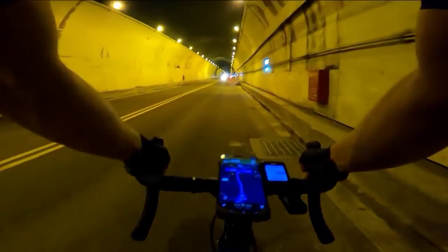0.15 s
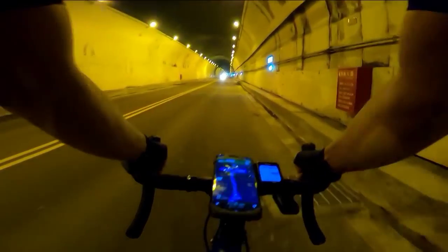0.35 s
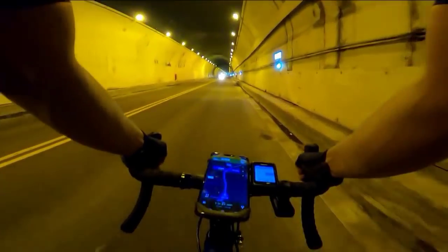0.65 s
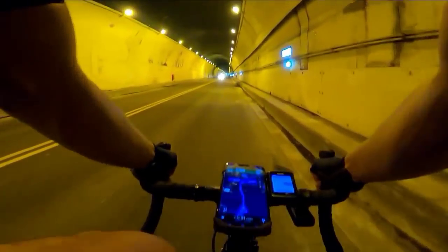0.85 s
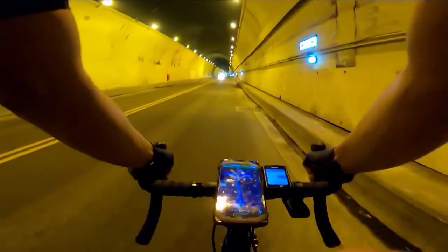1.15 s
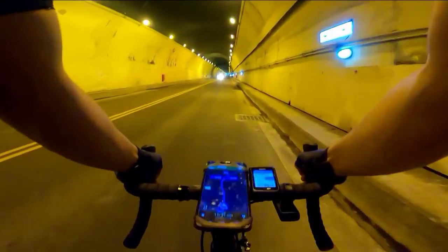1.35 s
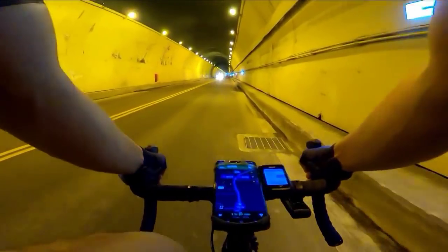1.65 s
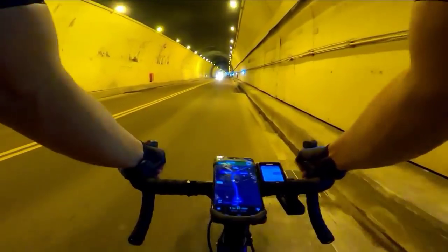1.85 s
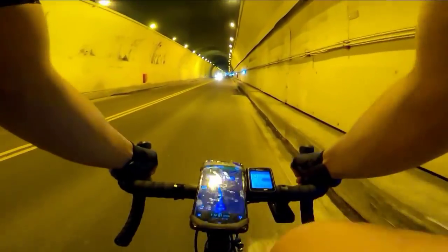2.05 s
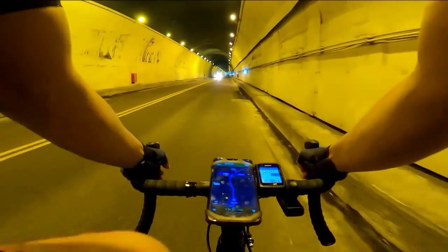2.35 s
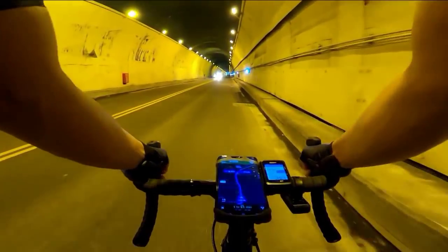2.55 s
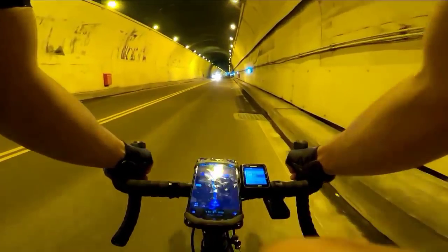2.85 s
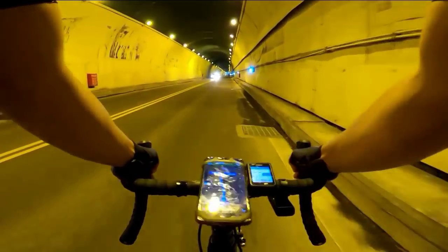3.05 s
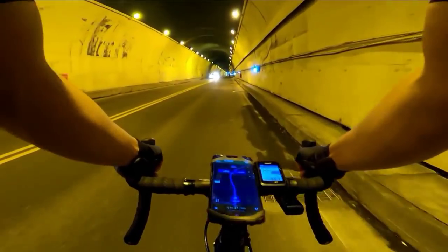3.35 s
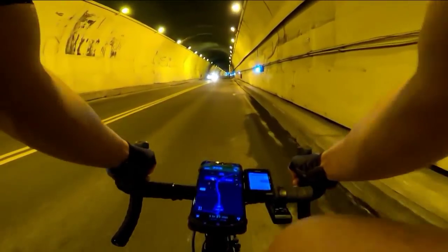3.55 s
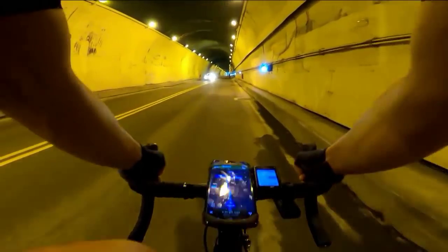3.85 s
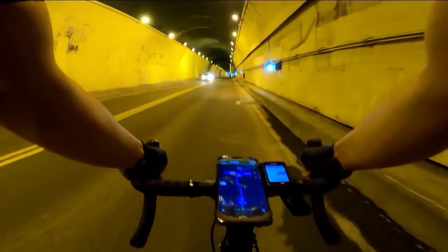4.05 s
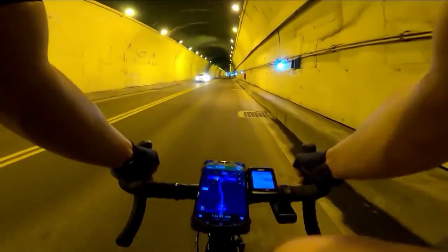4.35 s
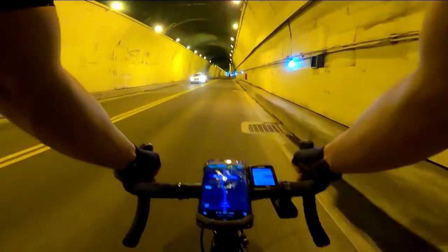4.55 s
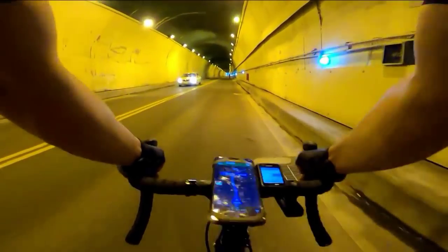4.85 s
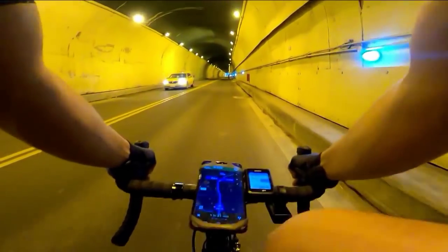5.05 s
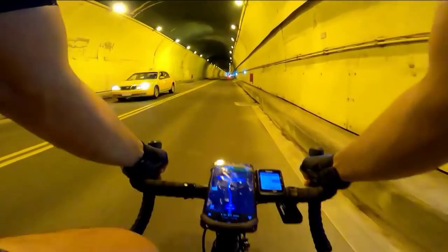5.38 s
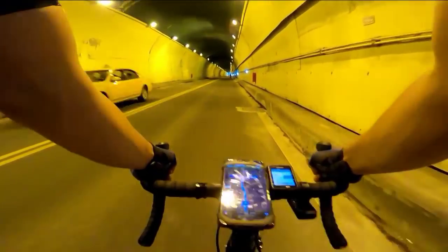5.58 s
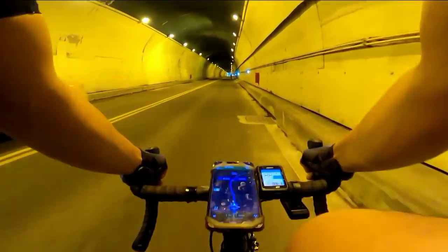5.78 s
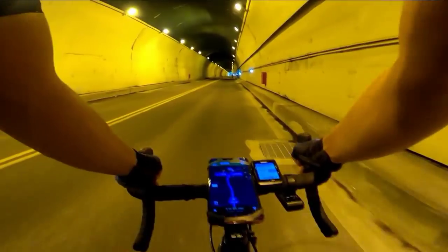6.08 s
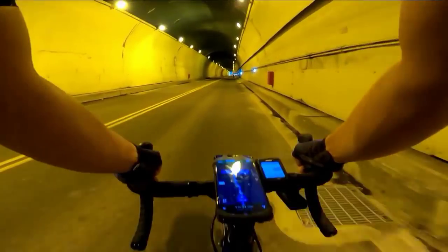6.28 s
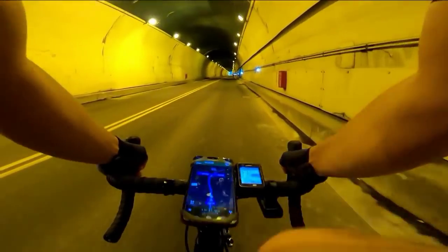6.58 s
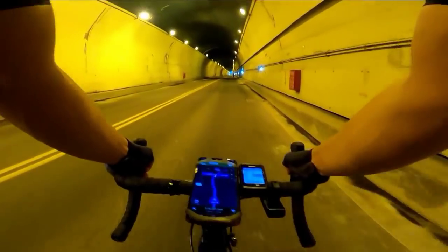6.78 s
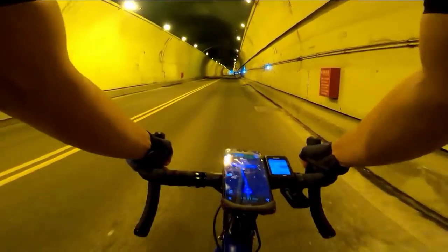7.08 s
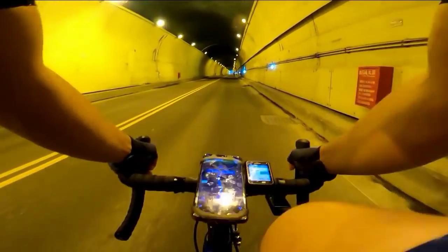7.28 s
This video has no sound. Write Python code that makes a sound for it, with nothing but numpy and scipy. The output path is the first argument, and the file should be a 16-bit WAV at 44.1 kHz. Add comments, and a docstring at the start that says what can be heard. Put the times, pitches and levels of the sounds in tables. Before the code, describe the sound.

Fast cycling wind fills a microphone worn on the chest in a road tunnel. Deep rumble and rustle shake both sides separately over a steady airy roar and hiss, which drops out abruptly in gusts. Rough hollow low flutters come mostly from the left, with short dull blows throughout. After about five and a half seconds a car passes in the other lane as a broad tyre roar.

```python
"""A road tunnel, heard from a bicycle ridden fast, through the two microphone ports of a chest camera.
At the ports wind rumbles and rustles as shaped noise; rough gliding tones make hollow swells, mostly left.
Behind them air roars and hisses as noise partly shared by the ports, sagging abruptly in the gusts.
Short noise bursts are hard blows of wind; a car passing in the other lane adds a swell of tyre roar."""
import sys
import numpy as np
from scipy import signal
from scipy.fft import rfft, irfft
from scipy.io import wavfile
from scipy.ndimage import uniform_filter1d, minimum_filter1d

SR = 44100
rng = np.random.default_rng(int(sys.argv[2]) if len(sys.argv) > 2 else 0)


def int16_out(signal):
    """Quantize to a 16-bit WAV file."""
    q = np.round(np.clip(np.atleast_2d(signal).T, -1, 1) * 32767)
    wavfile.write(sys.argv[1], SR, q.astype(np.int16))


N = 327222
TIME = np.arange(N) / SR   # [s]
BINS = np.maximum(np.arange(N // 2 + 1) * SR / N, 1)   # [Hz]


def from_db(db):
    """Decibels to gain."""
    return 10 ** (np.asarray(db) / 20)


def in_time(rows):
    """Each column of a curve after its time column, sample by sample."""
    s, *columns = np.transpose(rows)
    return [np.interp(TIME, s, c) for c in columns]


def in_frequency(points):
    """A table of (frequency [Hz], value) read at every bin, along a logarithmic frequency axis."""
    hz, value = np.transpose(points)
    return np.interp(np.log(BINS), np.log(hz), value)


def random_bins():
    """White noise as a spectrum."""
    return rng.standard_normal(len(BINS)) + 1j * rng.standard_normal(len(BINS))


def drift(rate):
    """Slow chance with a spread of 1, changing about `rate` times a second."""
    step, points = 64, 8192   # drawn once every 64 samples
    hz = np.arange(points // 2 + 1) * SR / (step * points)
    slow = irfft(rfft(rng.standard_normal(points)) / (1 + (hz / rate) ** 2))
    return np.interp(np.arange(N) / step, np.arange(len(slow)), slow / slow.std())


def noise(spectrum):
    """Coloured noise at one port, rms 1."""
    x = irfft(random_bins() * from_db(in_frequency(spectrum)), N)
    return x / x.std()


# likeness of the two ports: (frequency [Hz], likeness [0-1])
PORT_LIKENESS = [(100, .88), (500, .88), (1200, .89), (1480, .6), (1900, .83), (3000, .76), (4000, .48),
                 (5000, .13), (6000, .02)]
# phase lead of the left port: (frequency [Hz], lead [rad])
LEFT_LEAD = [(150, 1.4), (400, 1.05), (1000, .68), (1380, 1.05), (1680, .36), (2100, .72), (3000, .9),
             (5000, .9)]


def airborne(spectrum, pan_db=0):
    """Noise that reaches both ports: partly shared, the left one leading; rms 1."""
    alike = np.clip(in_frequency(PORT_LIKENESS), 0, 1)
    shared = np.sqrt(alike) * random_bins()
    left = shared * np.exp(1j * in_frequency(LEFT_LEAD)) + np.sqrt(1 - alike) * random_bins()
    right = shared + np.sqrt(1 - alike) * random_bins()
    panned = np.array([left * from_db(pan_db / 2), right * from_db(-pan_db / 2)])
    x = irfft(panned * from_db(in_frequency(spectrum)), N)
    return x / x.std()


def steadied(x, span_s):
    """Evens out chance swells longer than span_s, so that the flow sets the strength."""
    power = uniform_filter1d(x ** 2, max(int(span_s * SR), 2), mode="wrap")
    return x / np.sqrt(.9 * power + .1)


def swell(s, half_length_s):
    """A smooth (Gaussian) rise and fall around time s, of height 1."""
    return np.exp(-.5 * ((TIME - s) / half_length_s) ** 2)


def shelved(x, db, share):
    """Raises or lowers one part of the spectrum by a level that moves in time."""
    return x + (from_db(db) - 1) * irfft(rfft(x) * in_frequency(share), N)


# sudden drops of the rush in the gusts: (time of onset [s], depth [dB], hold [s], recovery [s])
RUSH_SAGS = [(0.352, 5, 0.18, 0.07), (0.702, 1.5, 0.075, 0.034), (0.833, 4.5, 0.061, 0.23),
             (1.228, 4, 0.045, 0.11), (1.904, 6, 0.015, 0.037), (1.965, 5.5, 0.26, 0.11),
             (2.384, 6.5, 0.046, 0.079), (2.659, 6, 0.023, 0.037), (3.646, 3, .04, 0.08),
             (4.177, 7, 0.019, .11), (4.695, 11.5, 0.013, 0.1), (4.986, 8, 0.035, 0.092),
             (6.56, 2, 0.043, .02), (6.74, 6.5, .025, 0.057), (6.879, 4.5, 0.045, 0.12)]


def sag_db():
    """Every sag falls within milliseconds, holds, and recovers evenly in dB."""
    fall_s, total = .007, 0
    for s, depth, hold, recovery in RUSH_SAGS:
        corners = s + np.cumsum([0, fall_s, hold, recovery])
        total = total + np.interp(TIME, corners, [0, -depth, -depth, 0])
    return total


# moments when the small eddies die away: (time of deepest point [s], depth [dB], half length [s])
EDDY_CALMS = [(0.16, 4, 0.061), (1.001, 7, 0.027), (1.513, 4.5, 0.035), (2.471, 9, 0.023),
              (3.189, 14.5, 0.032), (3.529, 13.5, 0.039), (3.932, 7, 0.037), (4.76, 8, 0.023),
              (5.971, 1, 0.057), (6.24, 7, .06)]


def calm_db():
    """The small eddies die away and return smoothly."""
    return -sum(depth * swell(s, length) for s, depth, length in EDDY_CALMS)


# turbulence on each port, before gain and lumps: (time [s], rumble level [dB])
LEFT_RUMBLE_LEVEL = [(0.0, -21), (0.44, -14.5), (0.76, -25), (0.84, -14), (1.08, -19), (1.76, -15),
                     (1.92, -23), (2.04, -20.5), (2.12, -22.5), (2.36, -15), (2.72, -19.5), (2.8, -13),
                     (3.0, -19), (3.12, -21), (3.2, -11.5), (3.42, -23), (3.52, -17), (3.72, -15),
                     (3.84, -26), (4.0, -15), (4.2, -20), (4.48, -18.5), (4.76, -23), (4.84, -13.5),
                     (4.96, -21), (5.04, -19.5), (5.3, -20), (5.4, -16.5), (5.68, -25), (5.8, -19.5),
                     (6.72, -20.5), (7.41, -15)]
RIGHT_RUMBLE_LEVEL = [(0.0, -15), (0.28, -14), (0.44, -20.0), (0.68, -10.5), (1.16, -12), (1.44, -14),
                      (1.48, -13.5), (1.96, -11), (2.08, -23.5), (2.16, -9), (2.28, -16), (2.4, -11.5),
                      (2.76, -15.5), (3.16, -14.5), (3.28, -18.5), (3.4, -9.5), (3.64, -16), (4.04, -11.0),
                      (4.36, -12.5), (4.96, -16), (5.12, -21), (5.2, -12), (5.92, -12.5), (6.16, -10.5),
                      (6.24, -15.5), (6.44, -13.5), (6.52, -19), (6.72, -19), (6.96, -18), (7.0, -12),
                      (7.24, -13.0), (7.41, -19.5)]
# colour of the big eddies at each port: (frequency [Hz], relative level [dB per Hz])
LEFT_RUMBLE_COLOUR = [(3, -42), (10, -12), (18, 0.5), (32, -7.5), (44, 2), (60, -15), (85, -6.5), (115, -9),
                      (170, -18), (400, -32), (1500, -82)]
RIGHT_RUMBLE_COLOUR = [(3, -33), (10, -3), (22, 2.5), (45, 2.5), (75, 2.5), (115, -5.5), (160, -13),
                       (300, -15.5), (1500, -77)]
# colour of the smaller eddies at each port: (frequency [Hz], relative level [dB per Hz])
LEFT_EDDY_COLOUR = [(60, -30.5), (130, -5), (190, -1.5), (270, -1.5), (350, -6.5), (480, -26.5), (700, -17),
                    (1500, -49.5), (4000, -81)]
RIGHT_EDDY_COLOUR = [(60, -28), (120, -0.5), (175, 9.5), (260, -7), (360, -6), (500, -11.5), (800, -14),
                     (1500, -32.5), (4000, -69)]


def buffeting(lump_db=1.7, lump_rate=14, right_lump_db=1.7, patchy_db=2.5, patchy_rate=9,
              eddy_follow=0.2, left_gain_db=2.2, right_gain_db=0.3, left_eddies_db=-18.5, right_eddies_db=-23):
    """Each port sits in its own turbulence: big eddies rumble, smaller ones rustle above them in patches."""
    left_db, = in_time(LEFT_RUMBLE_LEVEL)
    right_db, = in_time(RIGHT_RUMBLE_LEVEL)
    left_level = from_db(left_db + left_gain_db + lump_db * drift(lump_rate))
    right_level = from_db(right_db + right_gain_db + right_lump_db * drift(lump_rate))
    left_rumble = left_level * steadied(noise(LEFT_RUMBLE_COLOUR), span_s=0.11)
    right_rumble = right_level * steadied(noise(RIGHT_RUMBLE_COLOUR), span_s=0.06)
    patches = patchy_db * drift(patchy_rate) + calm_db()
    left_rustle = from_db(left_eddies_db + patches + sag_db()) * noise(LEFT_EDDY_COLOUR)
    follow_db = eddy_follow * (right_db - right_db.mean())   # the right rustle partly follows its rumble
    right_rustle_level = from_db(right_eddies_db + patches + .5 * sag_db() + follow_db)
    right_rustle = right_rustle_level * steadied(noise(RIGHT_EDDY_COLOUR), span_s=0.013)
    return np.array([left_rumble + left_rustle, right_rumble + right_rustle])


def churned(x, patchy_db, rate):
    """Eddies of different sizes come and go: each band swells and thins on its own."""
    centres = np.geomspace(300, 2000, num=6)   # [Hz]
    spectrum, out = rfft(x), 0
    for share in np.eye(len(centres)):
        band = irfft(spectrum * np.interp(BINS, centres, share), N)
        out = out + band * from_db(patchy_db * drift(rate))
    return out / out.std()


# strength of the airflow, before gains: (time [s], roar level [dB], hiss level [dB])
AIRFLOW_LEVELS = [(0.0, -27, -33), (0.07, -19.5, -33.5), (0.21, -19, -31.5), (0.34, -19.5, -31.5),
                  (0.66, -20.5, -33.5), (1.14, -18.5, -30), (1.38, -21.5, -34), (1.5, -19, -30.3),
                  (1.83, -19, -29.5), (2.39, -18, -28.5), (2.83, -20, -31), (3.09, -17.5, -27),
                  (3.4, -19, -29), (3.8, -19.5, -30), (3.87, -18.5, -28.5), (4.9, -19, -28.5),
                  (5.21, -20, -30), (5.36, -17.5, -25.5), (5.55, -18.5, -28.5), (5.88, -19.5, -28.5),
                  (6.39, -23, -31.5), (6.52, -22, -38.5), (6.58, -28.5, -41), (6.85, -24.5, -35.5),
                  (7.18, -20.5, -32), (7.42, -28, -39.5)]
# the hiss shifts to the right behind the car: (time [s], left-right difference [dB])
HISS_SHIFT = [(0, -2), (5.8, -1.9), (6.4, -6), (7.42, -6)]
# puffs of bright, ragged hiss, and thin spots: (time of peak [s], lift [dB], half length [s])
HISS_PUFFS = [(0.63, 0.5, .025), (0.817, 2, .018), (1.036, 3.5, 0.018), (1.196, 2, .015), (1.553, 2, 0.039),
              (1.689, 2, 0.021), (1.797, 1, 0.014), (2.26, 3, 0.024), (2.339, 2, .035), (2.537, 1, 0.028),
              (2.626, -4, 0.016), (2.952, -0.7, 0.023), (3.18, 0.5, 0.021), (3.378, 3, .018),
              (4.347, 0.5, 0.021), (4.913, 1.5, 0.02), (5.42, 1.5, 0.018), (5.48, 3.5, 0.011),
              (5.537, 2.5, .016), (5.706, 1, .015), (5.775, 1.5, 0.016), (5.868, 1.5, 0.021),
              (6.059, 1.5, .022), (6.331, 1.5, .05), (6.645, 0.5, .014), (6.732, 1, 0.018),
              (6.991, 3, 0.026), (7.415, 5, 0.011)]
# colour of the tunnel roar, then of the hiss: (frequency [Hz], relative level [dB per Hz])
ROAR_COLOUR = [(40, -9), (140, 4.5), (260, 4.5), (480, 3), (620, -0.5), (810, 0), (950, 1.5), (1150, -0.5),
               (1400, -5.5), (1650, -7), (2000, -17.5), (2800, -22.5), (5000, -61.5), (12000, -76.5)]
HISS_COLOUR = [(600, -9), (1400, 6), (2000, 5), (2500, 0), (3100, -2.5), (4000, -7), (5200, -13),
               (6100, -15), (6700, -19), (7700, -23), (8200, -30), (10300, -29), (11500, -40.5),
               (14000, -56.5)]
# the part of the roar that thins in the calms: (frequency [Hz], share [0-1])
ROAR_BASS = [(280, 1), (600, 0)]
# lean of the hiss to either port: (frequency [Hz], left-right difference [dB])
HISS_LEAN = [(1500, 2.5), (2300, -0.5), (3200, -1), (6000, -0.5), (7200, 4.5), (10000, 1)]
# lift of the hiss's treble: (time [s], level [dB])
TREBLE_LEVEL = [(0, 0), (5.4, -1), (6.2, 2), (6.9, 1.5), (7.42, 1.5)]
# what counts as treble: (frequency [Hz], share [0-1])
HISS_TREBLE = [(2800, 0), (4800, 1)]


def rush(roar_gain_db=3.0, hiss_gain_db=2.0, roar_sag=0.71, roar_lag_s=0.01, roar_flicker_db=0.42,
         hiss_flicker_db=0.77, grain_db=0.8, roar_pan_db=0.5, surge_db=0.5, puff_grain=0.26,
         roar_puff=0.51, roar_calm=0.33, eddy_rate=45):
    """The tunnel's roar and the hiss of air over the housing, both shaken by the same eddies."""
    roar_db, hiss_db = in_time(AIRFLOW_LEVELS)
    pan_db, = in_time(HISS_SHIFT)
    treble_db, = in_time(TREBLE_LEVEL)
    sag, eddies, surges = sag_db(), drift(eddy_rate), surge_db * drift(17)
    puffs = sum(lift * swell(s, length) for s, lift, length in HISS_PUFFS)

    late_sag = np.interp(TIME - roar_lag_s, TIME, sag)   # the roar drops a moment after the hiss
    roar = churned(airborne(ROAR_COLOUR, roar_pan_db), patchy_db=0.98, rate=15)
    roar = shelved(roar, roar_calm * calm_db(), ROAR_BASS)
    roar_level = roar_db + roar_gain_db + surges + roar_puff * puffs
    roar_level = roar_level + roar_sag * late_sag + roar_flicker_db * eddies

    # the smallest eddies make the hiss ragged, differently at each port
    grain = (grain_db + puff_grain * puffs) * np.array([drift(220), drift(220)])
    hiss = from_db([pan_db / 2, -pan_db / 2]) * airborne(HISS_COLOUR, in_frequency(HISS_LEAN))
    hiss = shelved(hiss, treble_db, HISS_TREBLE)
    hiss_level = hiss_db + hiss_gain_db + surges + puffs + sag + hiss_flicker_db * eddies + grain
    return from_db(roar_level) * roar + from_db(hiss_level) * hiss


def shedding(swells, wander, throb_db, across_lag, rest_db=-24, rest_hz=170.2):
    """A rough tone following each swell's gliding pitch: (strength, tone, tone lagging across_lag [rad])."""
    power = from_db(rest_db + .5 * calm_db()) ** 2   # the shedding between swells
    pull = power * rest_hz
    for s, db, hz, glide, length in swells:
        weight = (from_db(db) * swell(s, length)) ** 2
        power = power + weight
        pull = pull + weight * (hz + glide * (TIME - s))
    pitch = pull / power * (1 + wander * drift(42.59))   # the strongest swell rules the pitch
    phase = 2 * np.pi * np.cumsum(pitch) / SR
    throb = from_db(throb_db * drift(36))
    near, far = throb * np.sin(phase), throb * np.sin(phase - across_lag)
    near, far = [steadied(tone / tone.std(), span_s=0.039) for tone in (near, far)]
    return np.sqrt(power), near, far


# flutter at each port; the strong swells on the left come about once per turn of the pedals, those on
# the right mostly in the gusts; levels before port gain:
# (time of peak [s], level [dB], shedding pitch [Hz], glide [Hz/s], half length [s])
LEFT_SWELLS = [(0.275, -9.5, 187.5, 399, 0.026), (0.36, -11.5, 148.2, -1, 0.035),
               (0.435, -8, 233.4, 199, 0.032), (0.51, -9, 249, 399, .03), (0.62, -14.5, 164.6, -300, 0.029),
               (0.72, -18, 159.6, -200, 0.028), (0.79, -17, 245.5, 500, .03), (0.95, -14, 280, -200, 0.051),
               (1.15, -14, 173.4, 199, 0.036), (1.235, -8, 214.2, 597.5, .028),
               (1.315, -9.5, 243, -300, 0.047), (1.41, -12, 198, -500, .022),
               (1.47, -15, 150.7, -1000, 0.027), (1.57, -15, 185.8, 899.5, .021),
               (1.69, -16.5, 290, 1.5, 0.046), (1.97, -9, 171, 0, 0.031), (2.035, -8, 231.8, 0, 0.02366),
               (2.085, -9, 198.7, -300, 0.024), (2.16, -15, 168.8, -200, 0.05),
               (2.28, -14, 156.6, -450, 0.043), (2.5, -19.5, 401, 799.5, 0.036), (2.59, -17, 279, 2, .04),
               (2.78, -10.5, 227.5, 199, .042), (2.9, -14.5, 201.3, -200, .042),
               (3.06, -13.5, 163.6, -350, 0.046), (3.13, -16.5, 222, -1, .02),
               (3.25, -14.5, 88.2, -1, .045), (3.32, -17.5, 219.1, -300, 0.027), (3.52, -15, 245, 1, .035),
               (3.65, -9.5, 204.7, -1, 0.044), (3.79, -13.5, 167.8, 198, 0.028),
               (4.03, -13.5, 271, -600, .04), (4.21, -18.5, 165, -1, .025),
               (4.38, -14.5, 270.2, -400, .035), (4.55, -18.5, 230, -200, .03),
               (4.66, -17.5, 260.3, 0, 0.036), (4.91, -14.5, 108.8, 498, .06),
               (5.03, -16, 240, -500, 0.028), (5.11, -10.5, 202, -400, 0.034),
               (5.19, -13, 167.8, -400, 0.024), (5.34, -13.5, 182, 1, 0.024), (5.51, -19.5, 473, 1201, .03),
               (5.72, -15, 216, -500, .042), (5.81, -13, 283.3, 2501, .022), (5.95, -15.5, 160, -300, .035),
               (6.42, -14.5, 196.8, 203, 0.0354), (6.53, -10, 217, 249, .04),
               (6.67, -13, 247.2, -2000, .025), (6.75, -16, 156.5, 101, 0.031),
               (6.85, -14, 190.1, 500, .035), (6.91, -17.5, 275.7, -1, 0.033),
               (7.16, -17.5, 170.6, 2, 0.026), (7.27, -13, 187.3, 400, .04), (7.38, -9, 264, 300, 0.042)]
RIGHT_PORT_SWELLS = [(0.34, -16.5, 268.6, -2, 0.037), (0.87, -14, 189.1, -500, .045),
                     (1.88, -14.5, 150.3, 401, .05), (2.24, -18, 160.6, -400, 0.024),
                     (2.39, -13.5, 190, 0, 0.026), (2.63, -11, 120, 649.5, 0.05),
                     (2.8, -17, 200.3, 0, 0.037), (3.67, -16, 220, -3, .03), (3.8, -15, 151.1, -400, 0.039),
                     (4.19, -14, 159, -7.5, 0.042), (4.69, -13.5, 241, 6, 0.0243),
                     (5.01, -12, 201.8, 1, .04), (6.37, -20, 178.5, 3, 0.05),
                     (6.72, -15.5, 170.1, 0, 0.023), (6.87, -16.5, 198.3, 1, .025),
                     (7.27, -14, 169, -3, 0.044)]
# noise around the flutter: (frequency [Hz], relative level [dB per Hz])
WAKE_COLOUR = [(130, -19.5), (230, -4), (300, 3.5), (380, -5), (480, -5), (750, -12.5), (3000, -67.5)]
# the part of the left port's wake that carries to both ports: (frequency [Hz], relative level [dB per Hz])
HOLLOW_COLOUR = [(120, -9), (260, 0.5), (340, -2), (450, -2), (560, -9), (800, -21), (1300, -36),
                 (3000, -69)]


def flutter(wake_db=-12, hollow_db=-9.5, hollow_pan_db=3, across_db=-15, right_db=-1.5, right_wake_db=-7):
    """Vortices peel off each port almost regularly and break up; the left one's wake and tone carry across."""
    strength, near, far = shedding(LEFT_SWELLS, wander=.065, throb_db=2.5, across_lag=2.4)
    right_strength, right_tone, _ = shedding(RIGHT_PORT_SWELLS, wander=0.2035, throb_db=4.0, across_lag=0)
    left = strength * (near + from_db(wake_db) * noise(WAKE_COLOUR))
    right_flutter = right_tone + from_db(right_wake_db) * noise(WAKE_COLOUR)
    right = from_db(right_db) * right_strength * right_flutter
    across = from_db(across_db) * strength * far
    hollow = from_db(hollow_db) * strength * airborne(HOLLOW_COLOUR, hollow_pan_db)
    return np.array([left, right + across]) + hollow


# short hard blows, many close to the onset of a sag:
# (time of peak [s], level [dB], left-right difference [dB])
WIND_BLOWS = [(0.347, -13.5, 4), (0.87, -21, 10), (1.39, -24, 4), (1.81, -14, 0), (1.9, -16.5, 6),
              (1.97, -26, 7), (2.16, -16, 10), (2.409, -13, 6), (2.665, -17, 7), (3.66, -16.5, 3),
              (4.165, -17, 0), (4.705, -13, 3), (4.986, -13, 3), (6.645, -20, 12), (6.735, -21, 4),
              (7.35, -28, 5)]
# colour of a blow: (frequency [Hz], relative level [dB per Hz])
BLOW_COLOUR = [(60, -16), (150, -12.5), (350, 5), (550, 3.5), (950, -6), (2000, -32), (6000, -60)]


def gusts(rise_s=0.017, fall_s=0.028):
    """Each blow builds up and dies within a few hundredths of a second, often harder on one port."""
    blows = 0
    for s, db, pan in WIND_BLOWS:
        shape = np.interp(TIME, [s - rise_s, s, s + fall_s], [0, 1, 0])
        blows = blows + from_db([[db + pan / 2], [db - pan / 2]]) * shape
    return blows * airborne(BLOW_COLOUR)


# the oncoming car, before sags: (time [s], level [dB])
CAR_LEVEL = [(0.0, -46), (4.0, -32.5), (5.2, -46), (5.6, -22.5), (6.06, -19.5), (6.35, -17.5), (6.56, -29),
             (6.74, -29.5), (6.9, -23), (7.42, -21.5)]
# colour of its tyres: (frequency [Hz], relative level [dB per Hz])
TYRE_COLOUR = [(150, -20), (300, 3), (470, 1), (680, 2), (850, 0.5), (1020, 3), (1350, -0.5), (1800, -24.5),
               (3000, -37), (8000, -63.5)]


def car(pan_db=-3.0, diffuse=0.4, lag_s=0.00013):
    """Tyre roar of a car passing one lane away: direct sound, later at the right port, plus wall scatter."""
    level_db, = in_time(CAR_LEVEL)
    direct = noise(TYRE_COLOUR)
    ports = np.array([direct, np.interp(TIME - lag_s, TIME, direct)])
    scattered = np.array([noise(TYRE_COLOUR), noise(TYRE_COLOUR)])
    ports = np.sqrt(1 - diffuse) * ports + np.sqrt(diffuse) * scattered
    return from_db(level_db + sag_db()) * ports * from_db([[pan_db / 2], [-pan_db / 2]])


def scene():
    """Wind on the ports over the rush and the traffic in the tunnel."""
    return buffeting() + rush() + flutter() + gusts() + car()


def record(dry, cutoff_hz=14500):
    """The microphone blocks slow pressure swings; a fast limiter tames peaks; ends are eased, the top is cut."""
    sound = signal.sosfilt(signal.butter(2, 8, "high", fs=SR, output="sos"), dry)
    headroom = 1 / np.maximum(np.abs(sound).max(axis=0), 1)   # one gain for both ports
    gain = uniform_filter1d(minimum_filter1d(headroom, size=120), size=120)
    ends = np.minimum(np.minimum(TIME, TIME[::-1]) / .003, 1)
    top_cut = signal.cheby2(12, 70, cutoff_hz, fs=SR, output="sos")
    return signal.sosfilt(top_cut, sound * gain * ends)


dry = scene()
out = record(dry)
int16_out(out)
```